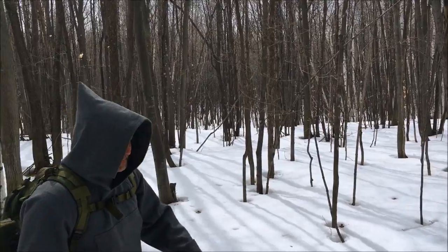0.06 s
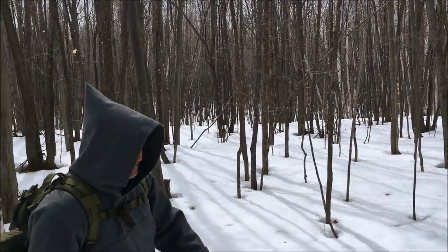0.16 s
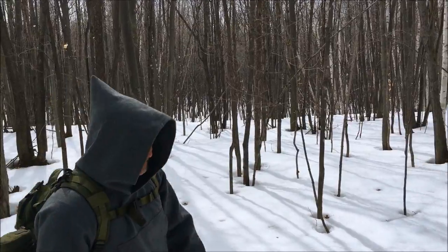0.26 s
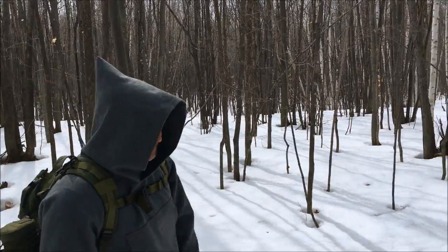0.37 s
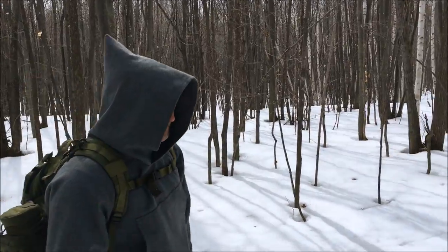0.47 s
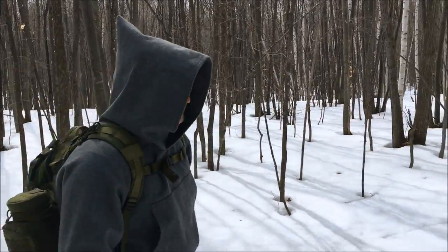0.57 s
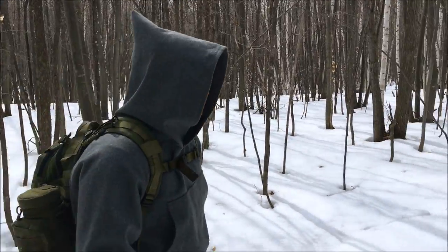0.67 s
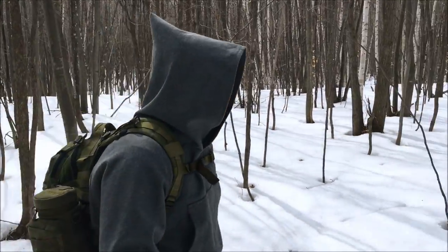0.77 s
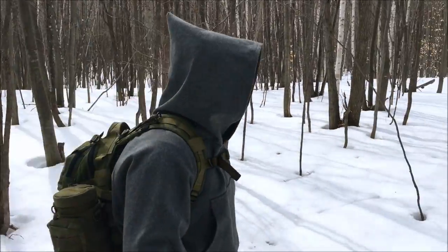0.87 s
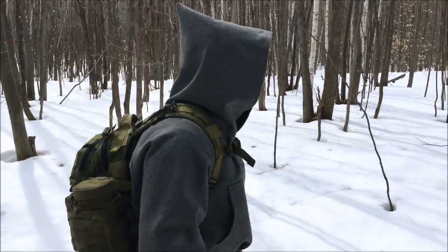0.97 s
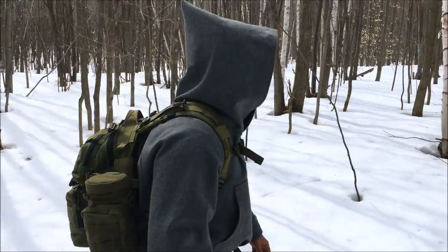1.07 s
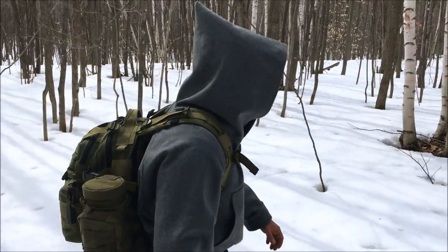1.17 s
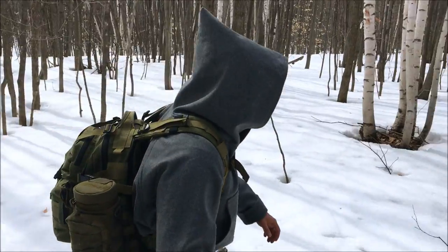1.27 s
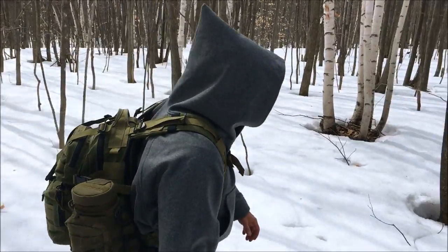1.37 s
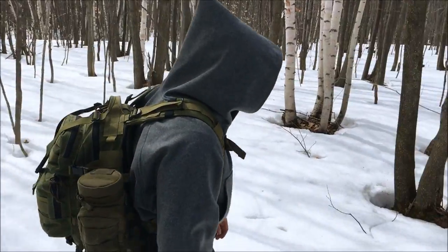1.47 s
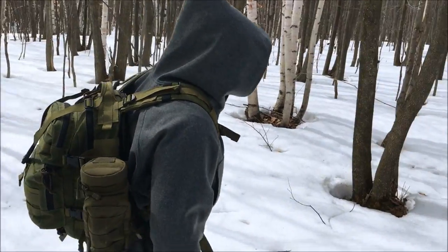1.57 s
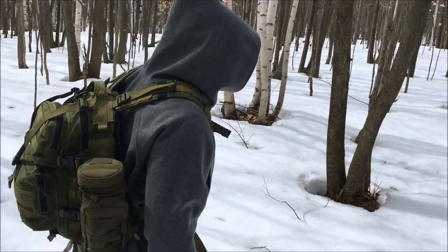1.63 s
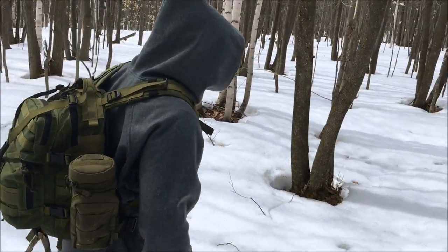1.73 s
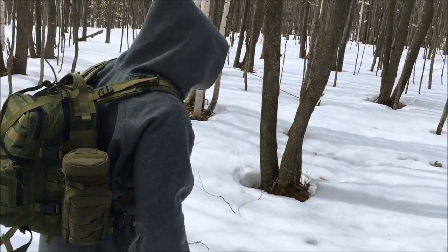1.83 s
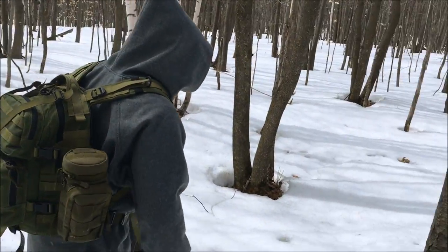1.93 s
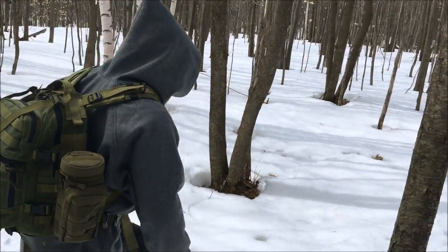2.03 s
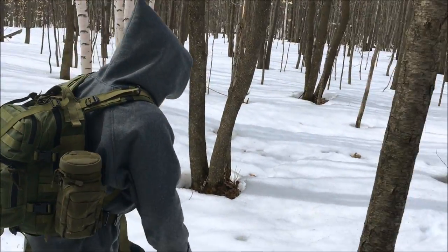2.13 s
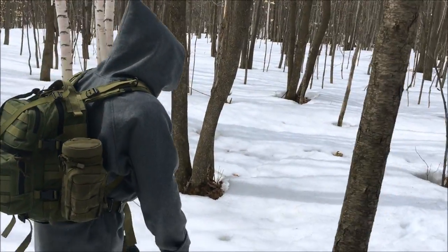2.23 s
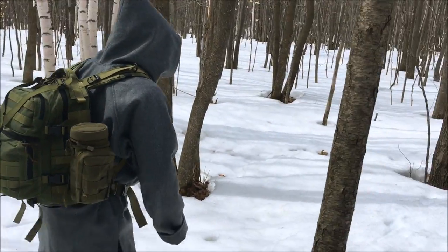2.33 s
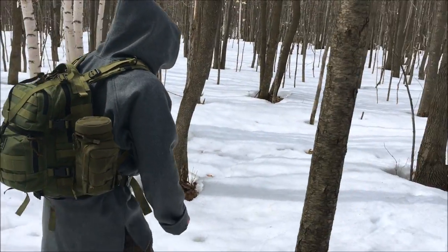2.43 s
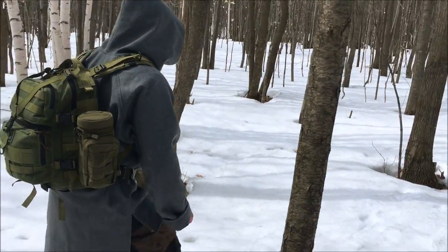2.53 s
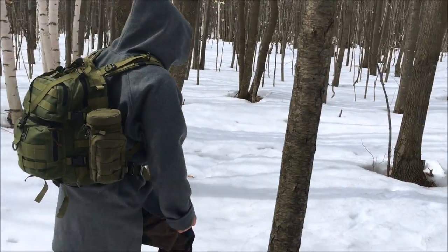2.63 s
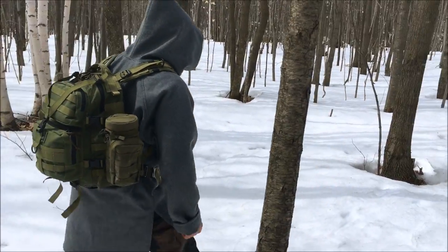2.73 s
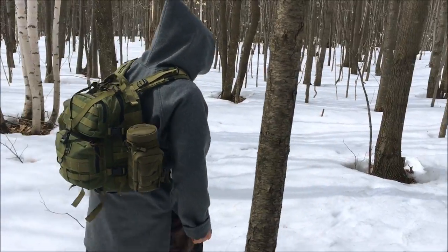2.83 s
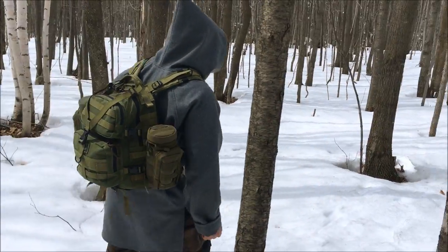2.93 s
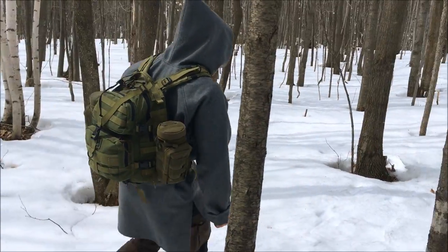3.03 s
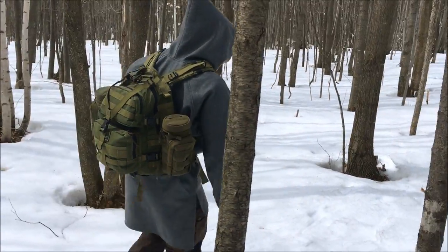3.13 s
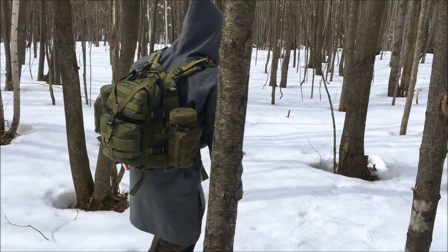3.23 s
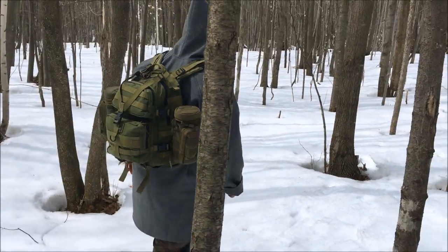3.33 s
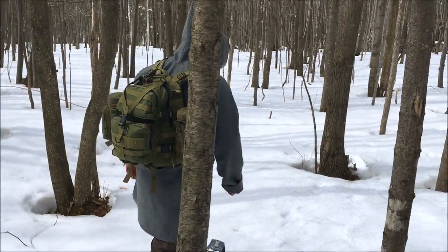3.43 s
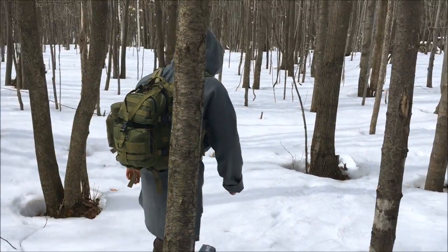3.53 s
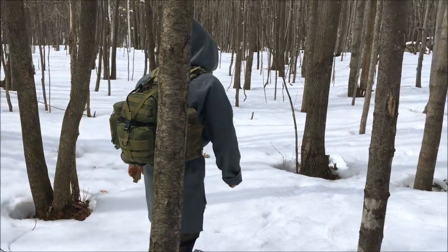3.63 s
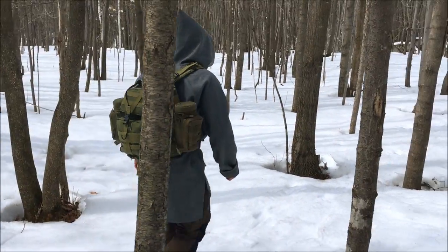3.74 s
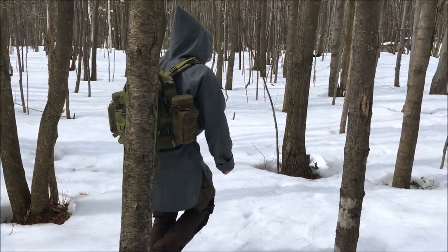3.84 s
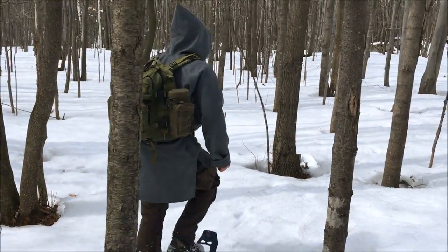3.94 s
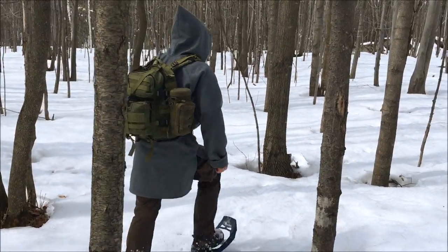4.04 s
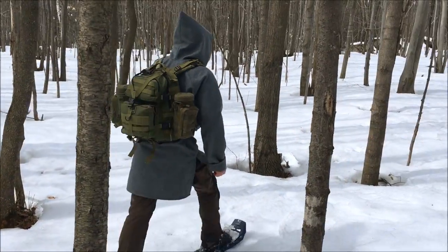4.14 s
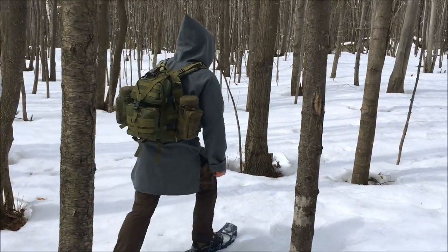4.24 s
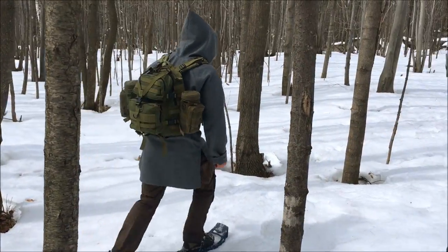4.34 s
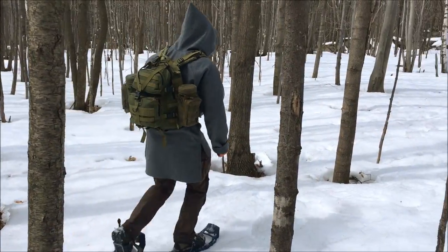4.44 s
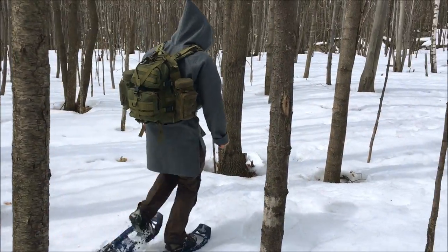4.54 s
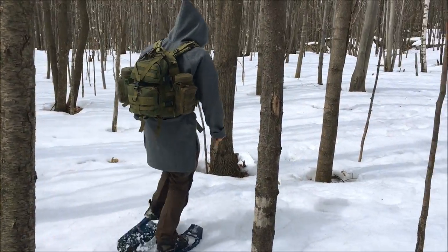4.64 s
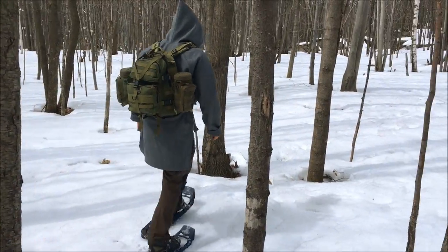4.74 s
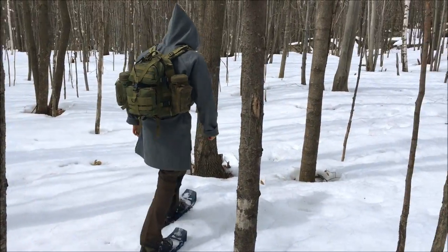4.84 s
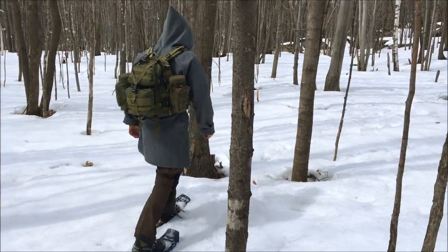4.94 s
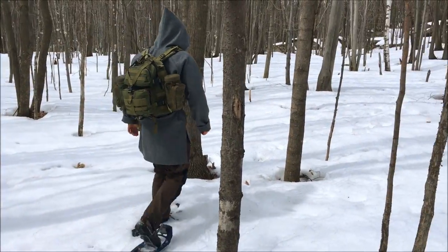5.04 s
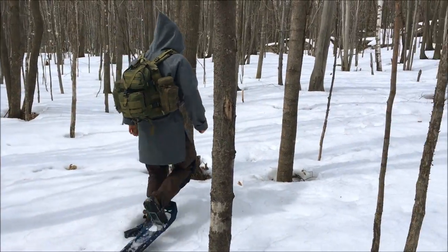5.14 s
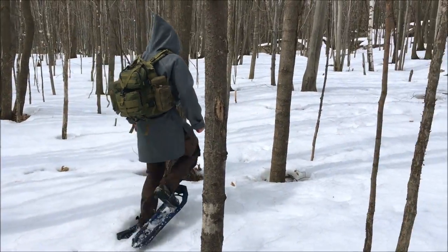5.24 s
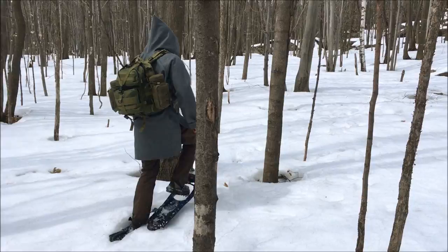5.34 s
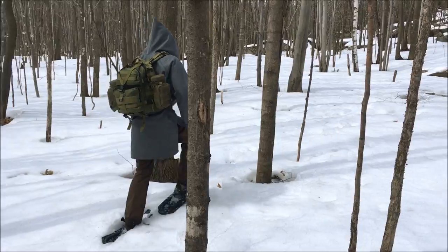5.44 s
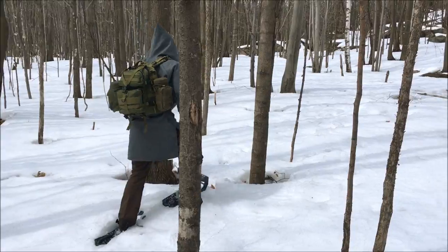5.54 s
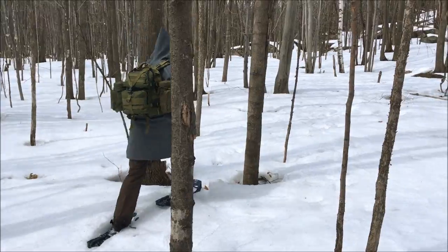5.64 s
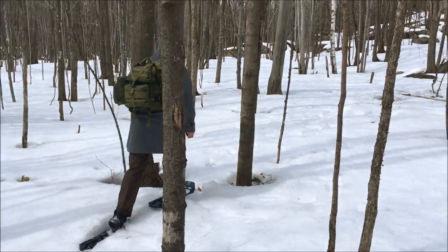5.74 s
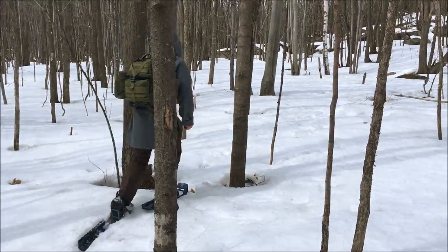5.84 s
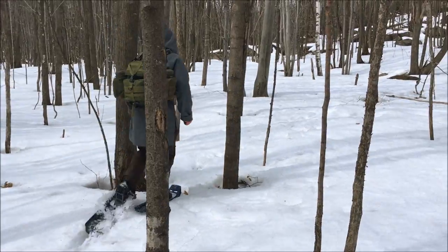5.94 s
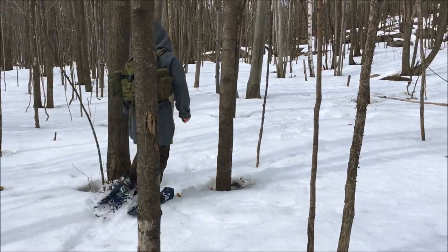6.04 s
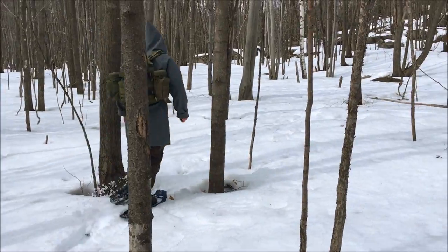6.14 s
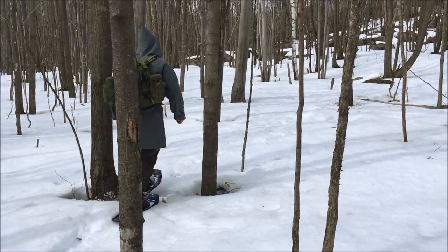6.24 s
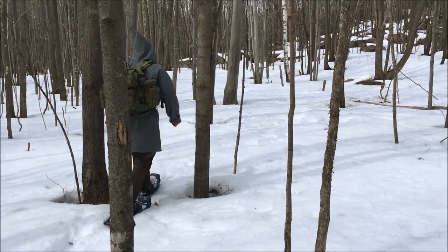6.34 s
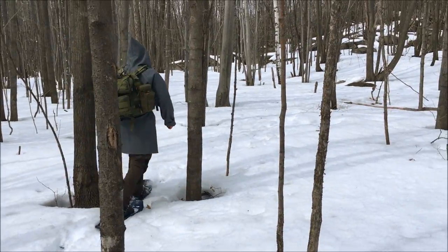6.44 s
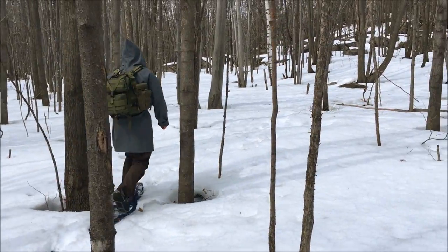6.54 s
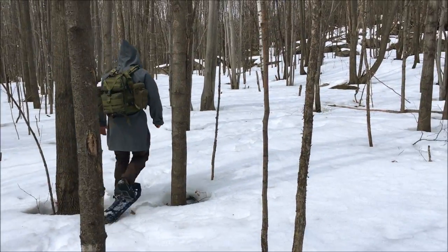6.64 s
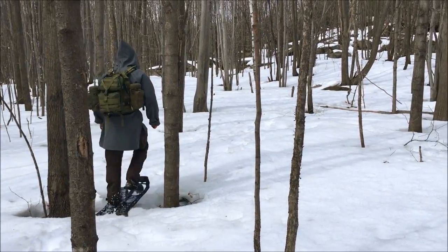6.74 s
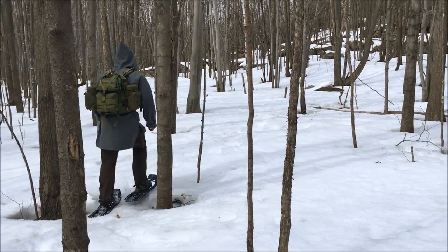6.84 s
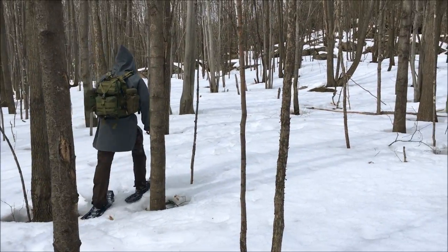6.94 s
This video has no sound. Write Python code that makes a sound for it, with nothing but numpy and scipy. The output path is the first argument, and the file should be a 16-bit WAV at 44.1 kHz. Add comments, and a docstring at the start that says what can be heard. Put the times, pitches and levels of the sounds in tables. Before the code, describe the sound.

After a brief silence, snowshoe steps crunch through coarse, icy snow close to the microphone. Each step slaps, presses down and drags with a spray of hissing grains. Crust cracks and a heavy crunch make the second step pair loudest, then short creaks follow, and the steps become softer as the walker moves off through a still, bare forest with a thin echo and faint hiss.

```python
"""After a moment of silence, crunching steps run throughout: a walker on snowshoes passes close to the microphone
in a still forest and moves off. Each shoe slaps, takes weight, sinks and drags on through old, grainy snow, and
every move breaks a cloud of ice grains: crunch from the crust, hiss from loose crystals, a hollow note from the
deck, a dull push from the packing snow. Frame creaks, cracks of crust, binding clacks and soft low thumps join in.
Behind them lie a thin echo from the trunks, the quiet air and the microphone's hiss."""
import sys
import numpy as np
from scipy import signal
from scipy.fft import rfft, irfft
from scipy.io import wavfile

SR = 44100
rng = np.random.default_rng(int(sys.argv[2]) if len(sys.argv) > 2 else 0)


def to_wav(sig):
    """Store sig (one row per channel, or 1-D mono) as 16-bit WAV at the path in sys.argv[1].

    Samples outside -1..1 are clipped; the rate is SR.
    """
    pcm = np.clip(np.atleast_2d(sig), -1, 1) * 32767
    pcm = np.round(pcm).astype(np.int16)
    wavfile.write(sys.argv[1], SR, pcm.T)  # frames by channels


N = 308610  # length in samples, about 7 s

# Colours of the four clouds of a stroke: crust, loose crystals, deck and packing snow.
# Each row: frequency in Hz, relative spectrum level in dB.
CRUNCH_COLOUR = [(300, -55), (700, -47), (1300, 0), (1800, 0.5), (3000, 2), (4200, 0.5), (5000, -3),
                 (6200, -0.5), (8000, -10.5), (16000, -10)]
SPRAY_COLOUR = [(1000, -43), (3300, -4), (5000, -10.5), (6000, -2.5), (8000, -4), (9300, -1), (10400, -6.5),
                (11500, -1.5), (16000, -0.5)]
DECK_COLOUR = [(150, -67.5), (420, -25), (560, -0.5), (700, 3), (1000, 1), (1350, -2), (1800, 1),
               (3500, -18), (8000, -51)]
WEIGHT_COLOUR = [(20, -49), (40, -34), (60, -4), (100, -1), (170, -0.5), (270, -1.5), (420, -3), (600, -11),
                 (1000, -12), (5000, -54)]
# The fine hiss of loose grains between the strokes. Each row: time in seconds, level in dB.
TRICKLE = [(.12, -55.5), (.45, -60.5), (.66, -61.5), (1, -50), (1.44, -59), (1.6, -46), (2.05, -46),
           (2.45, -43.5), (2.68, -53.5), (2.95, -52), (3.402, -60), (3.75, -56), (4.1, -56.5), (4.8, -59),
           (5.1, -55), (5.42, -84), (5.8, -61.5), (6.12, -48.5), (6.85, -65.5)]
TRICKLE_CRUNCH_DB, TRICKLE_DECK_DB = -11, -12  # against the hiss
# The hollow under the shoe: its usual note, and how far that strays between strokes (natural log).
NOTE_HZ, NOTE_SPREAD = 1100, 0.12
# The shoe breaks through in surges: rms depth, slowest and fastest rate.
SURGE_DB, SURGE_LOW_HZ, SURGE_HIGH_HZ = 1.2, 12, 35


def snow(note_share=0.52, note_width_hz=220, pop_share=0.22):
    """The crust gives way in small slips that shake all the clouds of grains together."""
    slips = wander(low_hz=44, high_hz=170)

    def cloud(points, per_s, spread_db, slip_db):
        """Grains bunched by the slips, ringing with one colour."""
        bunched = grains(per_s, spread_db) * amp(slip_db * slips)
        return unit(colour(bunched, points))

    crust = cloud(CRUNCH_COLOUR, per_s=5500, spread_db=2.3, slip_db=1.7)
    spray = cloud(SPRAY_COLOUR, per_s=26000, spread_db=4.0, slip_db=0.1)
    deck = cloud(DECK_COLOUR, per_s=4000, spread_db=3.5, slip_db=1.5)
    weight = cloud(WEIGHT_COLOUR, per_s=3100, spread_db=1.5, slip_db=1.5)
    crunch = np.sqrt(1 - pop_share) * crust + np.sqrt(pop_share) * pops()

    # loose grains keep trickling between the strokes
    trickle = amp(over_time(TRICKLE))
    out = trickle * (spray + amp(TRICKLE_CRUNCH_DB) * crunch + amp(TRICKLE_DECK_DB) * deck)

    for s, rise, hold, t60, crunch_db, spray_db, deck_db, weight_db in strokes():
        span = slice(int(s * SR), min(int((s + rise + hold + t60) * SR), N))
        age = np.arange(span.start, span.stop) / SR - s
        # a stroke swells, holds while the shoe moves, and dies away as the grains settle
        swell = np.clip(age / rise, 0, 1)
        settling = amp(-60 * np.maximum(age - rise - hold, 0) / t60)
        # the hollow favours one note, which changes with how the shoe lies
        note_hz = NOTE_HZ * np.exp(NOTE_SPREAD * rng.standard_normal())
        note = unit(resonate(deck[span], note_hz, note_width_hz))
        plain_deck = unit(deck[span][::-1])  # reversed, so that it does not follow the note
        hollow = np.sqrt(1 - note_share) * plain_deck + np.sqrt(note_share) * note
        parts = crunch[span] + amp(spray_db) * spray[span]
        parts = parts + amp(deck_db) * hollow + amp(weight_db) * weight[span]
        out[span] += amp(crunch_db) * swell * settling * parts
    # the surges move strokes and trickle alike
    return out * amp(SURGE_DB * wander(SURGE_LOW_HZ, SURGE_HIGH_HZ))


# The weight comes down on a shoe, about every 0.7 s. Each row: start in seconds, hold in seconds,
# t60 in seconds, crunch in dB, then spray and weight in dB against the crunch.
PLANTS = [(0.246, 0.064, 0.095, -41.5, -3, -10.5), (.902, 0.085, 0.54, -37.5, -4, -15),
          (1.042, 0.049, 0.79, -40.5, -6, -8.5), (1.607, 0.21, .36, -35, -5.5, -8.5),
          (2.189, 0.12, .25, -42, 1, -8), (2.863, 0.11, 0.25, -42, 2, -10),
          (3.547, 0.075, 0.66, -44.5, -1, -5.5), (4.268, .1, .27, -45, 4.5, -8),
          (4.958, 0.048, 0.29, -46, 3, -6.5), (5.706, 0.031, 0.12, -42, -1, -8),
          (6.418, 0.033, 1, -59.5, 4.5, -5.5)]
PLANT_RISE_S, PLANT_DECK_DB = 0.009, -6
# A shoe slaps the loose surface, mostly just before it takes weight.
# Each row: start in seconds, hold in seconds, crunch in dB, spray in dB against the crunch.
SLAPS = [(0.116, 0.051, -61.5, 16), (0.681, 0.028, -55, 16), (1.455, .042, -28, -3),
         (2.748, 0.14, -45.5, 3), (3.49, 0.0087, -44.5, 5), (4.213, 0.022, -51, 9.5), (5.24, .105, -60, 10),
         (5.595, 0.055, -56.5, 3.5), (5.99, 0.016, -37.5, 10)]
SLAP_RISE_S, SLAP_T60_S = 0.005, 0.11
# The swinging shoe drags over the snow.
# Each row: start in seconds, length in seconds, crunch in dB, spray in dB against the crunch.
DRAGS = [(0.181, 0.05, -51.5, 13), (0.485, 0.077, -48.5, 9), (0.71, 0.031, -45, 5.5), (1.13, 0.12, -35, 4),
         (2.468, 0.089, -40, 4), (3.113, 0.092, -46.5, -2.5), (3.835, 0.077, -43.5, 6.5),
         (4.533, .06, -49, 9.5), (4.874, 0.06, -54.5, 10), (5.065, 0.17, -45, 0), (5.457, .06, -54, 11.5),
         (5.924, 0.15, -47, 0.5), (6.235, 0.06, -49.5, 1), (6.672, 0.084, -57, 3), (6.918, 0.055, -48, 7.5)]
DRAG_SWELL_SHARE, DRAG_T60_S = 0.65, 0.093
# Slaps and drags sound the deck about as much as plants, with mostly less dull weight (dB against the crunch).
LIGHT_DECK_DB, LIGHT_WEIGHT_DB = -7, -15.5
# The snow gives way under the standing shoe.
# Each row: start in seconds, t60 in seconds, crunch in dB, weight in dB against the crunch.
SINKS = [(.378, .26, -53.5, -2), (.824, 0.12, -44.5, -6.5), (1.301, 0.26, -39.5, -4),
         (1.493, 0.11, -29.5, -11.5), (2.4, .4, -51, -2.5), (2.586, .05, -47, -2.5), (3.024, 0.2, -53, -2),
         (3.579, .15, -46.5, -18), (3.768, 0.19, -52, -3), (4.108, 0.33, -61, -12), (4.501, 0.15, -53, -15),
         (5.834, 0.12, -51, 1.5), (6.348, 0.026, -64.5, 9.5), (6.553, 0.29, -53, 0)]
SINK_RISE_S, SINK_HOLD_S, SINK_SPRAY_DB, SINK_DECK_DB = 0.017, 0.012, -4, 0.5


def strokes():
    """Every move of a shoe as (s, rise s, hold s, t60 s, crunch dB, spray dB, deck dB, weight dB)."""
    for s, hold, t60, db, spray_db, weight_db in PLANTS:
        yield s, PLANT_RISE_S, hold, t60, db, spray_db, PLANT_DECK_DB, weight_db
    for s, hold, db, spray_db in SLAPS:
        yield s, SLAP_RISE_S, hold, SLAP_T60_S, db, spray_db, LIGHT_DECK_DB, LIGHT_WEIGHT_DB
    for s, length, db, spray_db in DRAGS:
        swell = length * DRAG_SWELL_SHARE
        yield s, swell, length - swell, DRAG_T60_S, db, spray_db, LIGHT_DECK_DB, LIGHT_WEIGHT_DB
    for s, t60, db, weight_db in SINKS:
        yield s, SINK_RISE_S, SINK_HOLD_S, t60, db, SINK_SPRAY_DB, SINK_DECK_DB, weight_db


def pops(per_s=650, spread_db=2.0, low_hz=800, high_hz=6500, cycles=23.0, bunch_db=6.5):
    """Coarse lumps of ice pop in little bunches, each size of lump at its own pitch."""
    out = np.zeros(N)
    pitches = np.geomspace(low_hz, high_hz, num=16)
    for pitch in pitches:
        hz = pitch * rng.uniform(0.93, 1.07)
        bunches = amp(bunch_db * wander(low_hz=45, high_hz=60))
        lumps = grains(per_s / len(pitches), spread_db) * bunches
        out += unit(resonate(lumps, hz, hz / cycles))
    return unit(out)


# Cracks of crust and clacks of bindings, loud and faint, at set times.
# Each row: start in seconds, pitch in Hz, level in dB, sharpness from 0 to 1.
CRACKS = [(0.172, 5870, -47.5, 0.4), (.3688, 9200, -52, 0.8), (0.6326, 1460, -54.5, .7),
          (0.996, 1100, -32, 0.02), (1.2328, 3100, -30.5, .1), (1.2414, 1780, -30, 0.04),
          (1.2479, 1930, -28, 0), (1.2586, 4500, -26.5, 0.1), (1.266, 2980, -32, 0.7),
          (1.2814, 2210, -26.5, .25), (1.2912, 2020, -32, 0.95), (1.4865, 2780, -28.5, 0.1),
          (1.5088, 850, -24, 0.3), (1.616, 1090, -34.5, 0.5), (2.003, 2460, -40.5, 0.5),
          (2.0116, 840, -40.5, 0.16), (2.0959, 2700, -44.5, 0.5), (2.204, 764, -36.5, .7),
          (2.2339, 3600, -30.5, 0), (2.235, 1220, -36, 0), (2.3367, 940, -36.5, .7),
          (2.422, 1040, -47, 0.6), (2.592, 2300, -41, .8), (2.8806, 1640, -30, 0.92),
          (3.2509, 1280, -51, .4), (3.332, 6300, -56, 0.7), (3.4798, 880, -42.5, 0.26),
          (3.5537, 1600, -43, 0.4), (3.5855, 900, -36.5, 0.7), (4.2742, 2580, -37, 0.3),
          (4.6825, 8660, -47, 0.9), (4.951, 1510, -41, 0.2), (5.6, 3270, -50, .7),
          (5.6878, 1210, -38.5, 0.35), (5.85, 1510, -52, 0.6), (6.36, 1400, -50.5, 0.08),
          (6.6099, 1490, -44.5, 0.7)]
CRACK_RING_DB, CRACK_SNAP_DB = -1, -4  # against the level of the crack
# Colour of a snap. Each row: frequency in Hz, relative spectrum level in dB.
SNAP_COLOUR = [(100, -88), (500, -17), (1000, 1.5), (1700, 1), (4200, 4.5), (5200, -11), (7000, 4),
               (10000, -36), (16000, 16)]


def cracks(reach=2.14):
    """A crack is one sharp break and a run of splinters; it also rings the deck or crust for a few cycles."""
    t = np.arange(SR // 20) / SR
    level_samples = 0.008 * SR  # the levels are rms over 8 ms
    ring_cycles, ring_t60, break_t60, splinter_t60 = 10, 0.002, 0.0034, 0.022  # t60 in seconds
    out = np.zeros(N)

    def burst(t60):
        """Dying noise of energy 1."""
        noise = rng.standard_normal(len(t)) * amp(-60 * t / t60)
        return noise / np.linalg.norm(noise)

    for s, hz, db, sharpness in CRACKS + chips() + crumbs():
        splinters = np.sqrt(1 - sharpness) * burst(splinter_t60)
        # snow damps the ring almost at once
        mode = np.sin(2 * np.pi * hz * t) * amp(-60 * t / (ring_t60 + ring_cycles / hz))
        ring = np.sqrt(sharpness) * mode + signal.fftconvolve(splinters, mode)[:len(t)]
        # a large, low piece breaks with a duller snap than a small one
        dull = signal.butter(2, np.clip(reach * hz, 3000, 15000), fs=SR)
        breaking = np.sqrt(sharpness) * burst(break_t60) + splinters
        snap = signal.lfilter(*dull, colour(breaking, SNAP_COLOUR))
        add(out, s, amp(db + CRACK_RING_DB) * ring / np.linalg.norm(ring))
        add(out, s, amp(db + CRACK_SNAP_DB) * snap / np.linalg.norm(snap))
    return np.sqrt(level_samples) * out


# Small pieces of crust broken by every plant: level against its crunch, range of pitch, sharpness.
CHIP_DB, CHIP_LOW_HZ, CHIP_HIGH_HZ, CHIP_SHARPNESS = -5, 880, 4500, 0.34


def chips(count=3):
    """Small cracks at random moments while a shoe presses down, as rows like CRACKS."""
    rows = []
    for s, hold, _, db, _, _ in PLANTS:
        for when, small in rng.random((count, 2)):
            hz = CHIP_LOW_HZ * (CHIP_HIGH_HZ / CHIP_LOW_HZ) ** small
            rows.append((s + when * hold, hz, db + CHIP_DB, CHIP_SHARPNESS))
    return rows


# Crumbs of ice tick on the crust: dB against the trickle, spread either way in dB, range of pitch, sharpness.
CRUMB_DB, CRUMB_SPREAD_DB, CRUMB_LOW_HZ, CRUMB_HIGH_HZ, CRUMB_SHARPNESS = -1, 2, 3500, 8960, 0.51


def crumbs(count=90):
    """Ticks at random moments, their level following the trickle, as rows like CRACKS."""
    rows = []
    for when, small, force in rng.random((count, 3)):
        s = when * N / SR
        hz = CRUMB_LOW_HZ * (CRUMB_HIGH_HZ / CRUMB_LOW_HZ) ** small
        trickle_db = np.interp(s, *np.transpose(TRICKLE))
        db = trickle_db + CRUMB_DB + CRUMB_SPREAD_DB * (2 * force - 1)
        rows.append((s, hz, db, CRUMB_SHARPNESS))
    return rows


# The frame creaks on packed snow. Each row: start in seconds, length in seconds, pitch in Hz, level in dB.
CREAKS = [(0.856, 0.014, 1190, -41), (1.929, 0.041, 690, -54), (2, 0.03, 1260, -35.5),
          (2.078, 0.026, 723, -46), (2.137, 0.02, 724, -48.5), (2.191, 0.1, 690, -43),
          (2.269, 0.0097, 1430, -33.5), (2.304, 0.023, 1390, -35), (2.588, 0.023, 1030, -45.5),
          (3.247, .013, 710, -50), (3.716, 0.011, 1540, -45), (5.182, 0.021, 950, -44),
          (5.676, 0.032, 1140, -48.5), (6.424, .13, 1010, -55.5), (6.56, .03, 1260, -48.5)]
CREAK_SLIPS_PER_S, CREAK_EDGE_S = 900, 0.0032
CREAK_GRIT_DB = -1  # against the note
CREAK_WIDTH_SHARE = 0.28  # width of each resonance against its pitch


def creaks(spread_db=0.5):
    """The frame sticks and slips on packed snow: a run of slips rings one note, with some grit."""
    slips = grains(CREAK_SLIPS_PER_S, spread_db)
    grit = colour(slips, CRUNCH_COLOUR)
    out = np.zeros(N)
    for s, length, hz, db in CREAKS:
        span = slice(int(s * SR), int((s + length) * SR))
        age = np.arange(span.stop - span.start) / SR
        shape = np.clip(np.minimum(age, length - age) / CREAK_EDGE_S, 0, 1)
        width = hz * CREAK_WIDTH_SHARE
        note = resonate(resonate(slips, hz, width), hz, width)[span]
        creak = unit(shape * note) + amp(CREAK_GRIT_DB) * unit(shape * grit[span])
        add(out, s, amp(db) * creak)
    return out


# Soft low thumps. Each row: start in seconds, pitch in Hz, length in seconds, peak level in dB.
THUMPS = [(1.488, 86, 0.072, -37), (2.407, 85, .04, -58), (4.173, 62, 0.024, -44), (4.523, 55, 0.038, -53),
          (5.847, 95.5, 0.026, -49), (6.351, 111, 0.031, -49)]


def thumps():
    """A few soft cycles of bass that swell and fade."""
    out = np.zeros(N)
    for s, hz, length, db in THUMPS:
        t = np.arange(int(length * SR)) / SR
        swell = np.sin(np.pi * t / length) ** 2
        add(out, s, amp(db) * np.sin(2 * np.pi * hz * t) * swell)
    return out


# The highest hiss dulls as the walker moves away from the microphone.
# Each row: time in seconds, gain in dB above DULL_HZ.
DISTANCE = [(0.0, 0.5), (4.0, -3.5), (6.0, -3.5)]
DULL_HZ = 12900


def recede(x):
    """Distance weakens the very top of the hiss."""
    hz = np.fft.rfftfreq(N, 1 / SR) + 1
    top = irfft(rfft(x) / (1 + (DULL_HZ / hz) ** 20), N)
    return x + top * (amp(over_time(DISTANCE)) - 1)


def trunks(x, t60=0.36, echo_db=-24):
    """Bare trunks scatter a thin, short echo; the snow swallows the rest."""
    t = np.arange(SR // 2) / SR
    hits = rng.standard_normal(len(t)) * (rng.random(len(t)) < 1500 / SR)
    taps = hits * (t > 0.012) * amp(-60 * t / t60)  # nothing returns within 12 ms
    return amp(echo_db) * signal.oaconvolve(x, taps / np.linalg.norm(taps))[:N]


# The still forest and the microphone's hiss. Each row: frequency in Hz, relative spectrum level in dB.
QUIET_COLOUR = [(20, -23), (32, -10), (55, 4), (120, -5), (250, -11), (450, -15.5), (1200, -23),
                (2200, -26), (4500, -24), (10000, -22.5), (13500, -16.5), (16000, -17)]
QUIET_DB = -60.5


def quiet_air():
    """Steady noise with the colour of the still air and the microphone's hiss."""
    return amp(QUIET_DB) * unit(colour(rng.standard_normal(N), QUIET_COLOUR))


def amp(db):
    """Decibels to gain."""
    return 10 ** (np.asarray(db) / 20)


def unit(x):
    """Scales to rms 1."""
    return x / np.sqrt(np.mean(x ** 2) + 1e-20)


def add(mix, s, sound):
    """Mixes a sound in from time s."""
    part = mix[max(round(s * SR), 0):][:len(sound)]
    part += sound[:len(part)]


def over_time(points):
    """Joins (seconds, value) points by straight lines, one value a sample."""
    return np.interp(np.arange(N) / SR, *np.transpose(points))


def colour(x, points):
    """Gives x a spectrum through a causal filter of unit energy, so that clicks keep their sharp fronts."""
    size = 4096
    hz, db = np.transpose(points)
    bins_hz = abs(np.fft.fftfreq(size, 1 / SR)) + 1
    log_gain = np.log(amp(np.interp(np.log(bins_hz), np.log(hz), db)))
    # the Hilbert transform of the log gain gives the minimum phase
    taps = np.fft.ifft(np.exp(np.conj(signal.hilbert(log_gain)))).real[:size // 2]
    return signal.oaconvolve(x, taps / np.linalg.norm(taps))[:len(x)]


def wander(low_hz, high_hz):
    """Random movement of rms 1, mostly between two rates."""
    hz = np.fft.rfftfreq(N, 1 / SR)
    band = hz / np.hypot(hz, low_hz) / (1 + (hz / high_hz) ** 2)
    return unit(irfft(rfft(rng.standard_normal(N)) * band, N))


def grains(per_s, spread_db):
    """Random clicks of either sign: many small ones and a few large."""
    size = amp(spread_db * np.minimum(rng.exponential(1, N), 5))
    present = rng.random(N) < per_s / SR
    return unit(size * rng.choice([-1, 1], N) * present)


def resonate(x, hz, width):
    """One damped resonance, width in Hz."""
    r = np.exp(-np.pi * width / SR)
    return signal.lfilter([1, 0, -1], [1, -2 * r * np.cos(2 * np.pi * hz / SR), r * r], x)


def scene():
    """Footsteps, their echo and the quiet air."""
    steps = recede(snow() + creaks() + cracks() + thumps())
    return (steps + trunks(steps) + quiet_air())[None]


START_S, EDGE_HZ = 0.119, 15900  # end of the opening silence, top of the band


def record(dry, low_cut_hz=32):
    """The microphone opens after a moment of silence and sheds the deepest bass; then the band limit."""
    opened = dry * (np.arange(N) / SR > START_S)
    high_pass = signal.butter(3, low_cut_hz, "highpass", fs=SR, output="sos")
    opened = signal.sosfilt(high_pass, opened)
    low_pass = signal.firwin(511, EDGE_HZ, window=("kaiser", 9), fs=SR)
    return signal.oaconvolve(opened, low_pass[None], "same")


dry = scene()
out = record(dry)
to_wav(out)
```